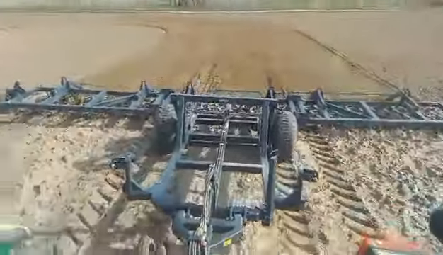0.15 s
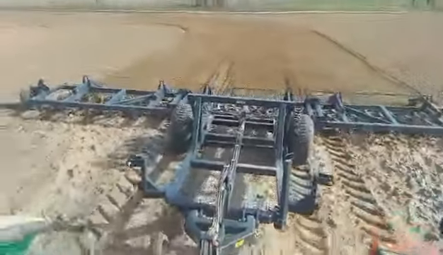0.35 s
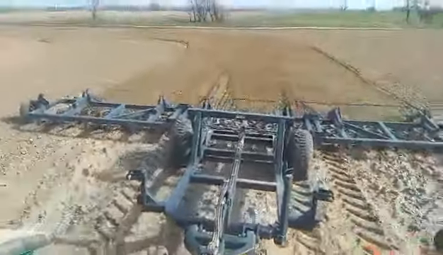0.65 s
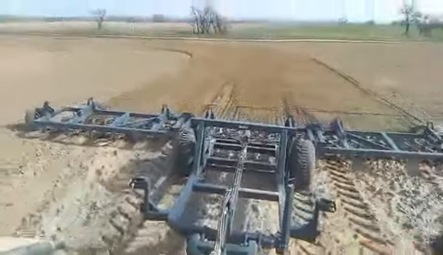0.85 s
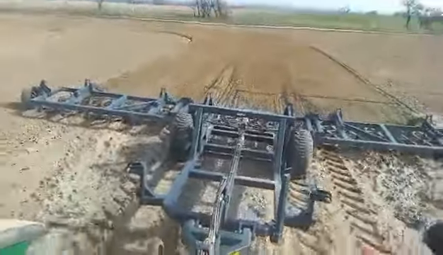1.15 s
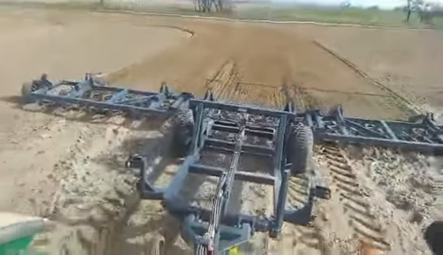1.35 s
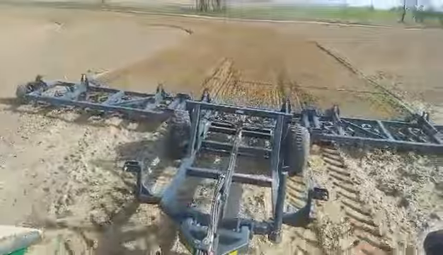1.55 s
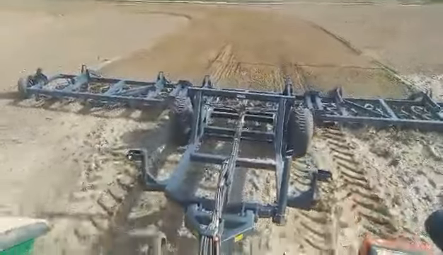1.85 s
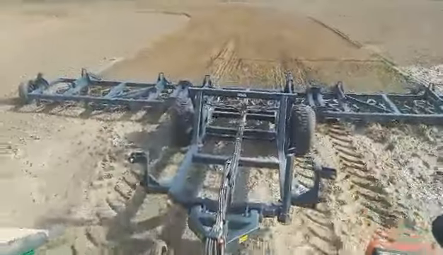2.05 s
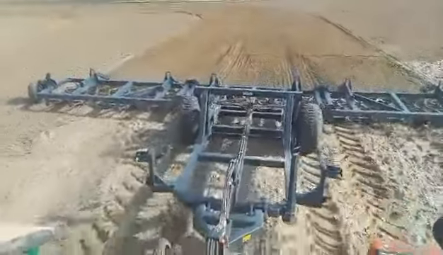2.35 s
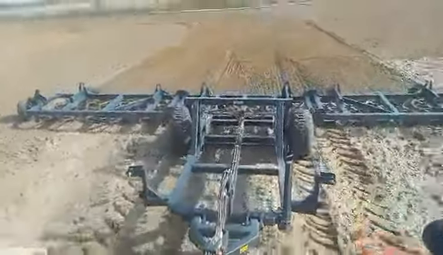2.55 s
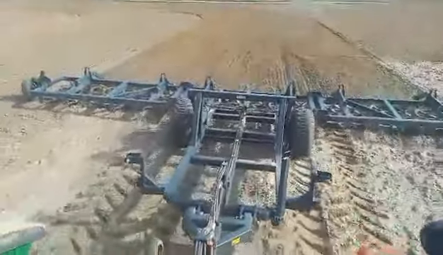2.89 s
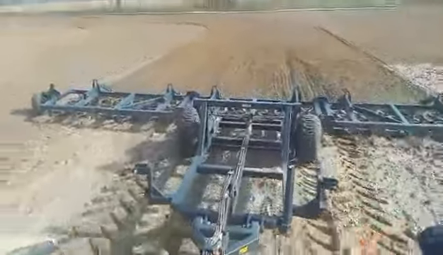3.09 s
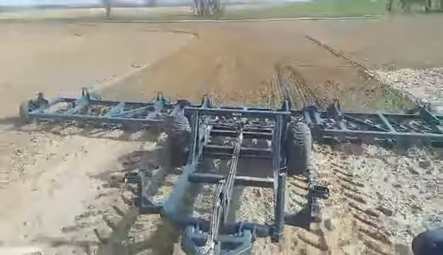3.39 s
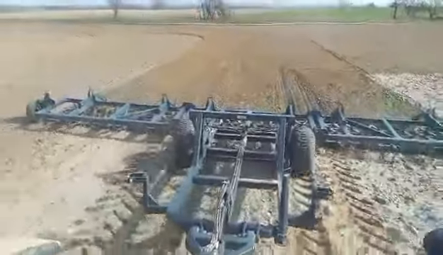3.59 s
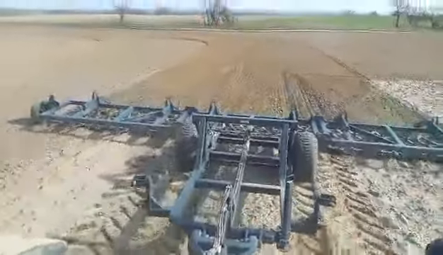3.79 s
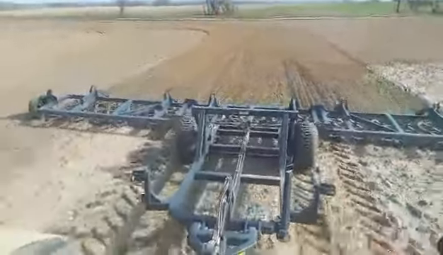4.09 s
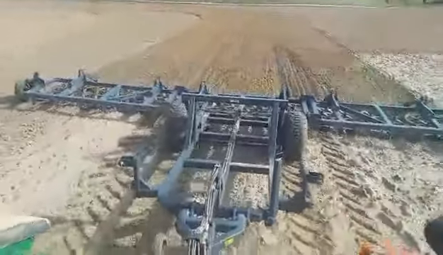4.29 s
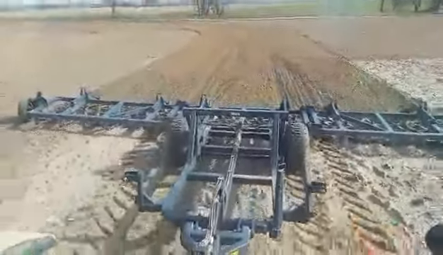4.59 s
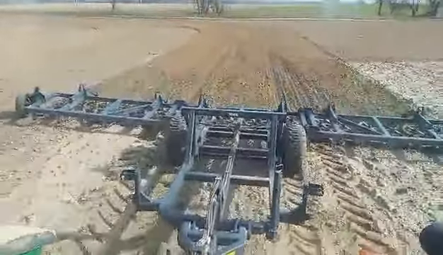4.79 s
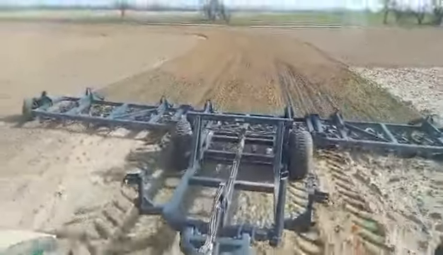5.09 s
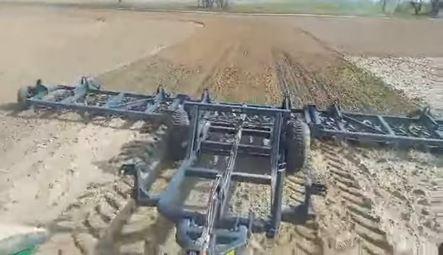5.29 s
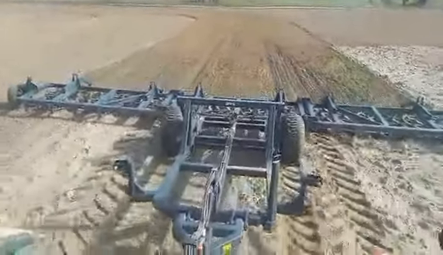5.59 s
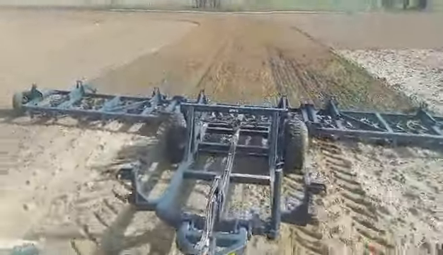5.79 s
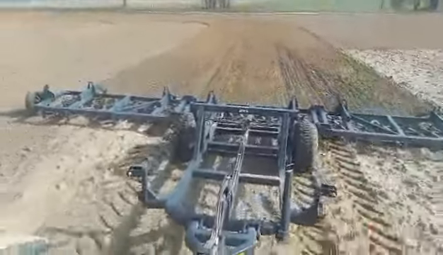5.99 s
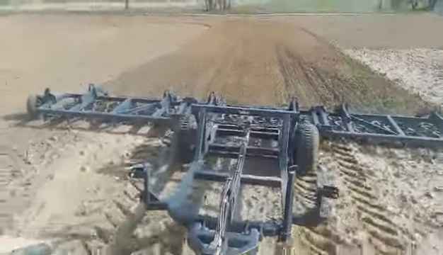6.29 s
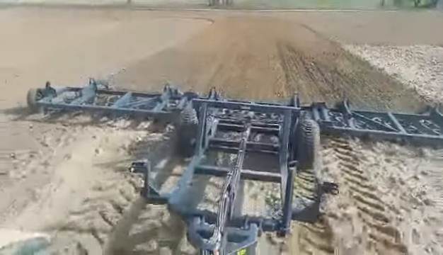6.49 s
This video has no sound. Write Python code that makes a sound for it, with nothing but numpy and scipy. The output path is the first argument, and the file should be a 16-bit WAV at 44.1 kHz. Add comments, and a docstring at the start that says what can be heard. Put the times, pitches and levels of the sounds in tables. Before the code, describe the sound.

Heavy diesel tractor pulling a steel harrow over dry ground, heard from the cab: surging low drone, rumble, crumbling soil, ticking fittings, hitch clanks.

```python
"""A six-cylinder tractor engine, built from tones at multiples of its cycle, is heard from inside the cab.
Its pitch sags and picks up and its main tone follows the load, while the running gear drones beside it.
Shaped noise makes the rolling rumble, soil roar, knock and hiss; random clicks make the crumbling soil.
Loose fittings tick and chatter, the harrow's links rattle and the hitch clanks over a bump: noise bursts
and dying tones. The turbocharger whistles faintly near the start."""
import sys
import numpy as np
from scipy import signal
from scipy.fft import rfft, irfft
from scipy.io import wavfile

SR = 44100
rng = np.random.default_rng(int(sys.argv[2]) if len(sys.argv) > 2 else 0)


def unload_audio(sound):
    """Save the sound as a 16-bit wav file, at the path given as the first command line argument."""
    columns = np.transpose(np.atleast_2d(sound))
    # keep every value between -1 and 1, then stretch to whole-number steps
    steps = np.round(np.clip(columns, -1, 1) * 32767)
    wavfile.write(sys.argv[1], SR, steps.astype(np.int16))


N = 293265
TIME = np.arange(N) / SR
FREQ = np.fft.rfftfreq(N, 1 / SR)
# How alike left and right are. Each row: frequency in Hz, likeness (1 the same, 0 unrelated, -1 opposite).
SIDE_LIKENESS = [(60, 1), (150, 0.96), (220, 0.84), (290, 0.6), (400, -0.27), (600, 1), (900, 0.16),
                 (1400, -0.19), (2400, 0.34), (4000, 0.066), (13000, -0.088)]


def amp(db):
    """Turns decibels into gain."""
    return 10 ** (np.asarray(db) / 20)


def unit(x):
    """Scales a sound to an rms (average strength) of 1."""
    return x / np.sqrt(np.mean(x ** 2) + 1e-20)


def read(points, hz):
    """Reads a table of values by frequency, on a logarithmic frequency axis."""
    f, value = np.transpose(points)
    return np.interp(np.log(hz + 1), np.log(f), value)


def curves(rows):
    """Draws each column of a time table as a line with a value at every sample."""
    s, *columns = np.transpose(rows)
    return [np.interp(TIME, s, c) for c in columns]


def add(mix, s, sound):
    """Mixes a stereo sound in at time s, cutting it off at the end of the mix."""
    part = mix[:, max(round(s * SR), 0):][:, :sound.shape[1]]
    part += sound[:, :part.shape[1]]


def drift(rate_hz):
    """Slow random wander of rms 1; a higher rate wanders faster."""
    t = np.linspace(0, N / SR, 4096)
    f = np.fft.rfftfreq(len(t), t[1])
    spectrum = rfft(rng.standard_normal(len(t))) * np.exp(-(f / rate_hz) ** 2)
    return np.interp(TIME, t, unit(irfft(spectrum)))


def colour(x, spectrum):
    """Filters a sound by a table of dB against frequency, then scales it to rms 1."""
    size = x.shape[-1]
    gain = amp(read(spectrum, np.fft.rfftfreq(size, 1 / SR)))
    return unit(irfft(rfft(x) * gain, size))


def noise(spectrum):
    """Stereo noise whose two sides are as alike at each frequency as the likeness table says."""
    mid, side = rfft(rng.standard_normal((2, N)))
    same = np.clip(read(SIDE_LIKENESS, FREQ), -1, 1)
    mid = mid * np.sqrt(1 + same)
    side = side * np.sqrt(1 - same)
    return colour(irfft(np.array([mid + side, mid - side]), N), spectrum)


def angle(hz):
    """Running phase of a tone in radians, from a random start."""
    return 2 * np.pi * (np.cumsum(hz) / SR + rng.random())


def swells(rows):
    """A bell-shaped swell of gain for each row: middle in seconds, level in dB, spread in seconds."""
    return sum(amp(db) * np.exp(-((TIME - s) / spread) ** 2 / 2) for s, db, spread in rows)


def peaks(hz, modes):
    """Gain in dB of a tone passing through resonances."""
    return sum(db / (1 + (2 * (hz - f) / width) ** 2) for f, width, db in modes)


def level_db(law, octaves, load_db):
    """A layer's level in dB rises with speed and with load, as far as its law says."""
    cruise_db, per_octave, per_load = law
    return cruise_db + per_octave * octaves + per_load * load_db


def cracks(per_s, spread_db):
    """Random clicks on each side, a few of them larger."""
    extra_db = spread_db * np.minimum(rng.exponential(1, (2, N)), 4)
    size = amp(extra_db) * rng.choice([-1, 1], (2, N))
    return size * (rng.random((2, N)) < per_s / SR)


def short_echoes(x, share=0.33, spread=.02, count=12):
    """Random short echoes within 0.02 s give the sound a fine, comb-like colour."""
    taps = np.zeros((2, int(spread * SR) + 2))
    for side in taps:
        delays = rng.integers(1, len(side), count)
        side[delays] = share * rng.choice([-1, 1], count) / np.sqrt(count)
    taps[:, 0] = 1  # the direct sound
    return unit(signal.oaconvolve(x, taps, axes=1)[:, :N])


def ring(modes, t, detune):
    """Dying tones of struck metal, slightly retuned for each call, with a random phase on each side."""
    out = 0
    for hz, db, t60 in modes:  # t60: seconds to fall by 60 dB
        tuned_hz = hz * (1 + detune * rng.standard_normal())
        turns = tuned_hz * t + rng.random((2, 1)) / 2
        out = out + amp(db - 60 * t / t60) * np.sin(2 * np.pi * turns)
    return out


def engine(firing_hz, load_db, firing_db=-20, uneven=0.11, uneven_hz=4, flutter=0.05, effort=1.0):
    """Six firings a cycle give the main tone; unequal cylinders add orders that sweep cab resonances."""
    # Strong engine orders. Each row: multiple of the four-stroke cycle, dB over the weak ones.
    strong_orders = [(4, 3), (9, 3.5), (12, 6), (13, 2.5), (15, 5.5), (18, 7.5), (21, 5.5), (27, 7),
                     (32, 5), (40, 6), (45, 8), (48, 9), (49, 4)]
    # Weak orders inside the cab, before its resonances. Each row: frequency in Hz, level in dB.
    weak_level = [(20, -76.5), (50, -38), (85, -37), (150, -32.5), (200, -47.5), (260, -48.5), (318, -61),
                  (350, -52), (390, -63.5), (560, -66.5), (800, -57)]
    # Cab resonances. Each row: frequency in Hz, width in Hz, boost in dB.
    cab_modes = [(114.8, 20, 9), (293.3, 28, 14), (337.8, 12, 7.5), (354, 2.7, 2.5), (529.7, 13, 11),
                 (552, 9.4, 11.5)]
    # Cab boom, order 10. Each row: time in seconds, level in dB.
    boom_level = [(0, -34), (.25, -15.5), (.5, -41.5), (1, -31), (1.35, -27), (1.7, -29), (2.3, -27),
                  (2.6, -49), (3, -31), (3.3, -16.5), (3.6, -27), (4, -20.5), (4.35, -22.5), (4.75, -18),
                  (5.15, -20), (5.5, -23), (6.1, -21), (6.65, -23)]
    # Exhaust hum, order 24. Each row: time in seconds, level in dB.
    hum_level = [(0, -35.5), (.8, -49), (1.1, -34.5), (1.5, -34.5), (1.8, -47), (2.3, -40.5), (2.6, -34),
                 (3.05, -38), (3.25, -53.5), (3.75, -48.5), (3.9, -37), (4.5, -29.5), (4.9, -47),
                 (5.1, -27.5), (5.35, -45), (5.62, -27), (5.85, -38), (6.05, -31.5), (6.27, -39.5),
                 (6.45, -31), (6.65, -41)]
    cycle = angle(firing_hz / 6)
    out = np.zeros((2, N))
    leading = {6: firing_db + load_db, 10: curves(boom_level)[0], 24: curves(hum_level)[0]}
    strong = {round(k): db for k, db in strong_orders}
    for order in range(2, 54):
        hz = firing_hz[::64] * order / 6  # every 64th sample is enough to read the levels
        phase = order * cycle + rng.uniform(0, 2 * np.pi)
        if order in leading:
            level = amp(leading[order]) * (1 + flutter * drift(10))
        else:
            order_db = read(weak_level, hz) + peaks(hz, cab_modes) + strong.get(order, 0)
            level = np.interp(TIME, TIME[::64], amp(order_db))
            level *= (firing_hz / firing_hz.mean()) ** effort
            level *= 1 + uneven * drift(uneven_hz)
            phase += uneven * drift(uneven_hz)
        # standing waves in the cab reach the two sides out of step
        apart = np.arccos(np.clip(read(SIDE_LIKENESS, hz.mean()), -1, 1)) / 2
        out += level * np.cos([phase + apart, phase - apart])
    return out


def running_gear(drone_hz, flutter=0.04):
    """A drone that follows ground speed, and a gear whine that swells as the tractor picks up."""
    # Each row: time in seconds, drone level in dB.
    drone_level = [(0, -16.5), (.15, -17), (.35, -21), (.8, -23), (1.1, -21), (1.45, -14), (1.65, -16),
                   (1.9, -24.5), (3.2, -23.5), (3.35, -18.5), (3.8, -21), (4.25, -19), (4.45, -22),
                   (4.9, -21), (5.3, -13.7), (5.55, -19.5), (5.85, -23.5), (6.1, -19), (6.65, -20.5)]
    # Each row: time in seconds, whine pitch in Hz, whine level in dB.
    whine_path = [(1.2, 380, -75), (1.63, 410, -46), (1.95, 425, -37.5), (2.22, 426, -36),
                  (2.35, 438, -39.5), (2.48, 450, -36.5), (2.62, 452, -78)]
    drone_gain = amp(curves(drone_level)[0]) * (1 + flutter * drift(6))
    whine_hz, whine_db = curves(whine_path)
    whine_gain = amp(whine_db) * (1 + flutter * drift(10))
    return drone_gain * np.cos(angle(drone_hz)) + whine_gain * np.cos(angle(whine_hz))


def rolling(rumble_db):
    """Rough ground shakes the cab, a bump thumps the chassis, and tyres and tines roar and moan in soil."""
    # Four noise colours. Each row: frequency in Hz, relative level in dB per Hz.
    rumble_colour = [(15, -34), (30, -28), (52, -16), (80, -4), (114, 0), (135, -7), (165, -6), (205, -12),
                     (280, -12.5), (320, -20), (355, -20.5), (480, -48.5), (900, -85)]
    roar_colour = [(150, -23), (300, -5), (400, -1), (480, -4.5), (555, -2), (630, -6), (710, -5.5),
                   (800, -10.5), (950, -10.5), (1300, -22.5), (2500, -47)]
    moan_colour = [(440, -39.5), (530, 11.5), (560, 13.5), (600, 2), (700, -37.5)]
    thump_colour = [(15, -20), (30, -6), (48, 15), (70, -5.5), (115, 18), (160, -0.5), (220, -30),
                    (500, -58)]
    # Tyres and tines in the soil, then the hollow moan. Each row: time in seconds, level in dB.
    roar_level = [(0, -42.5), (1.35, -40.5), (2.1, -40), (2.5, -36.5), (5.05, -41), (5.6, -39),
                  (6.65, -37.5)]
    moan_level = [(0, -58), (.7, -54.5), (1.4, -45), (2, -50), (3.3, -45.5), (3.8, -45.5), (4.4, -44.5),
                  (5.1, -42.5), (5.5, -47.5), (6.65, -62)]
    # A rough patch, then the thumps of a bump. Each row: middle in seconds, level in dB, spread in seconds.
    rough_patch = [(3.52, -34, 0.34)]
    bump_thumps = [(3.39, -17, 0.014), (3.568, -14, 0.029), (3.636, -18.5, 0.012)]
    rumble = (amp(rumble_db) + swells(rough_patch)) * noise(rumble_colour)
    roar = amp(curves(roar_level)[0] + 1.6 * drift(40)) * noise(roar_colour)
    moan = amp(curves(moan_level)[0]) * noise(moan_colour)
    thumps = swells(bump_thumps) * noise(thump_colour)
    return rumble + roar + moan + thumps


def clatter(firing_hz, clatter_db, depth=0.12, crank_depth=0.06, grain_db=1.4):
    """Combustion knock and grainy intake hiss pulse with each firing and each turn of the crank."""
    # Knock and hiss colours. Each row: frequency in Hz, relative level in dB per Hz.
    knock_colour = [(500, -26), (950, 4.5), (1400, 2.5), (1720, 0.5), (2100, -0.5), (2550, 2), (3100, -3.5),
                    (3800, -15.5), (5000, -24.5), (8000, -44)]
    hiss_colour = [(2000, -24.5), (3500, 6.5), (4700, 5), (5600, -1.5), (6700, -9), (7700, -21.5),
                   (8600, -23.5), (10500, -18.5), (13000, -9.5)]
    # Intake hiss. Each row: time in seconds, level in dB.
    hiss_level = [(0, -52.5), (.4, -56), (.7, -57.5), (1.05, -54), (1.4, -54), (1.6, -57), (1.93, -53.5),
                  (2.15, -56.5), (2.7, -52.5), (3.25, -57.5), (3.52, -54.5), (3.78, -54), (3.97, -56.5),
                  (4.5, -54), (4.9, -56.5), (5.2, -52.5), (5.82, -57.5), (6.65, -54)]
    crank = angle(firing_hz / 3)  # three firings a turn
    pulse = 1 + depth * np.cos(3 * crank) + crank_depth * np.cos(crank)
    knock = amp(clatter_db + 1.0 * drift(23)) * short_echoes(noise(knock_colour))
    hiss_db = curves(hiss_level)[0] + grain_db * drift(84)
    hiss = amp(hiss_db) * short_echoes(noise(hiss_colour))
    return pulse * (knock + hiss)


def soil(soil_db, per_s=550, spread_db=3):
    """Dry clods break into many tiny cracks; hard patches crunch."""
    # Crumbling soil. Each row: frequency in Hz, relative level in dB per Hz.
    crumb_colour = [(600, -28), (1500, 6), (2500, 5), (3300, -3), (4600, -11), (6000, -10.5), (9000, -40)]
    # Harder clods. Each row: middle in seconds, level in dB, spread in seconds.
    hard_clods = [(1.2, -53, 0.076), (1.48, -61.5, 0.031), (2.3, -62, 0.048), (2.72, -53.5, 0.036),
                  (3.44, -51.5, 0.14)]
    crumbs = short_echoes(colour(cracks(per_s, spread_db), crumb_colour))
    return (amp(soil_db) + swells(hard_clods)) * crumbs


def turbo(width_hz=350):
    """An airy whistle, a tone blurred by slow noise, that wavers in pitch and soon fades out."""
    # Each row: time in seconds, pitch in Hz, level in dB before the left-right balance.
    whistle_path = [(0, 12760, -74), (.3, 13000, -75), (.52, 12500, -68), (.8, 11800, -73),
                    (1.05, 12150, -67), (1.35, 12950, -58), (1.8, 13900, -86)]
    hz, whistle_db = curves(whistle_path)
    band = np.exp(-(FREQ / width_hz) ** 2)
    air = unit(irfft(rfft(rng.standard_normal((2, N))) * band, N))
    balance = amp([[-4], [3]])  # dB, left and right
    return amp(whistle_db) * air * np.cos(angle(hz)) * balance


def panel(grain_db=3, per_s=2500, spread_db=2):
    """A loose panel chatters by itself in short swells of tiny taps."""
    # Each row: middle in seconds, level in dB, spread in seconds.
    chatter_swells = [(.155, -50.5, 0.014), (.573, -45.5, 0.011), (1.11, -57, .012), (1.33, -54, 0.018),
                      (2.28, -61, .012), (2.43, -43, 0.0072), (2.555, -45, 0.013), (2.675, -50, .016),
                      (2.84, -51, 0.028), (3.12, -49.5, 0.027), (4.297, -44, 0.012), (4.56, -50, .025),
                      (4.772, -47, 0.01), (5.04, -47, 0.035), (5.26, -50, 0.023), (5.685, -46, 0.021),
                      (5.95, -48.5, 0.052), (6.17, -47.5, .015), (6.25, -45, 0.03), (6.44, -48, .013),
                      (6.56, -47, 0.043)]
    # Each row: frequency in Hz, relative level in dB.
    chatter_colour = [(900, -9.5), (2400, 7.5), (3500, 8), (5000, 4.5), (6500, -2), (7800, -10.5),
                      (9000, -17), (11000, -7.5), (13000, -12.5)]
    taps = colour(cracks(per_s, spread_db), chatter_colour)
    return swells(chatter_swells) * amp(grain_db * drift(140)) * taps


def grit(ring_hz=2000, decay=0.00063, right_db=-20):
    """A grain of grit snaps beside the left microphone: a tone that dies within a few milliseconds."""
    # Each row: start in seconds, left level in dB.
    grit_snaps = [(0.5783, -19)]
    out = np.zeros((2, N))
    t = np.arange(256) / SR
    snap = np.exp(-t / decay) * np.cos(2 * np.pi * ring_hz * t - np.pi / 4)
    for s, db in grit_snaps:
        add(out, s, amp([[db], [db + right_db]]) * snap)
    return out


def singing(waver=.006):
    """A shaken panel swells on a slightly unsteady note and dies away."""
    # Each row: middle in seconds, pitch in Hz, level in dB, spread in seconds.
    panel_notes = [(2.1, 346, -38, 0.09), (2.45, 667, -45, 0.091), (2.46, 920, -47.5, 0.062),
                   (2.76, 709, -38.5, 0.029), (3.246, 339.7, -34.5, 0.15), (3.733, 895, -45, 0.027)]
    out = 0
    for s, hz, db, spread in panel_notes:
        wavering_hz = hz * (1 + waver * drift(23))
        out = out + swells([(s, db, spread)]) * np.cos(angle(wavering_hz))
    return out


def harrow(per_s=80, spread_db=2, detune=.07, rise=.0002, count=7):
    """Steel links of slightly different sizes strike one another in dense bursts."""
    # Loose links rattling together. Each row: middle in seconds, level in dB, spread in seconds.
    rattle_swells = [(2.43, -42.5, .011), (3.625, -41.5, .05), (4.832, -46.5, .01), (5.003, -45, .012),
                     (5.92, -44.5, .018), (6.255, -42.5, .028)]
    # Tones of a link. Each row: frequency in Hz, level in dB, time to fall 60 dB in seconds.
    link_modes = [(1150, -6, .015), (1750, -1, .025), (2150, 0, .02), (2650, -3, .015), (3800, -10, .012),
                  (4900, -9, .015), (6000, -14, .012)]
    t = np.arange(1024) / SR
    links = 0
    for _ in range(count):
        strikes = cracks(per_s, spread_db)
        link = (1 - np.exp(-t / rise)) * ring(link_modes, t, detune)
        links = links + signal.oaconvolve(strikes, link, axes=1)[:, :N]
    return swells(rattle_swells) * unit(links)


def tick(db, top_db, t60=0.025, rise=0.00015, snap_db=4, snap_t60=0.0089,
         cab_db=-22, cab_t60=0.18, ring_db=1, detune=.02):
    """A snap, a short dry burst and a thin ring, followed by the cab's brief echo."""
    # Colour of the burst. Each row: frequency in Hz, relative level in dB.
    tick_colour = [(800, -14), (2200, 10), (3200, 7), (4400, 3.5), (5700, 4), (6800, -5.5), (7700, -9.5),
                   (9000, -7), (10500, -5.5), (12600, -2), (14000, 1.5)]
    # Tones of the fitting. Each row: frequency in Hz, level in dB, time to fall 60 dB in seconds.
    fitting_modes = [(4360, -11.5, 0.071), (5770, -13, 0.026), (7860, -20.5, 0.032), (10320, -20, 0.053),
                     (11800, -19, 0.055)]
    t = np.arange(4096) / SR
    snap = amp(snap_db - 60 * t / snap_t60)
    echo = amp(cab_db - 60 * t / cab_t60)
    decay = snap + amp(-60 * t / t60) + echo
    # the extra treble comes in gradually from 6 to 10 kHz
    tone = [(hz, level + top_db * np.clip((hz - 6000) / 4000, 0, 1)) for hz, level in tick_colour]
    burst = decay * colour(rng.standard_normal((2, len(t))), tone)
    thin_ring = amp(ring_db) * ring(fitting_modes, t, detune)
    return amp(db) * (1 - np.exp(-t / rise)) * (burst + thin_ring)


def fittings():
    """A loose fitting ticks in short runs, each tick a small knock with its own brightness."""
    # Each row: start in seconds, level in dB, extra top treble in dB.
    tick_times = [(2.824, -49, -5), (3.1222, -35.5, -1), (3.1546, -37, 3), (3.194, -35.5, 3),
                  (3.8379, -40, -2), (3.885, -48.5, 1), (4.11, -37.5, 5), (4.1135, -42, 0),
                  (4.1364, -39, 1), (4.1649, -39, 4), (4.171, -43, -1), (4.2083, -42, 0), (4.213, -44, -4),
                  (4.2851, -49, -3), (4.604, -43, -8), (4.629, -40.5, -13), (4.6678, -42.5, -7),
                  (4.759, -45, -11), (5.063, -44, -9), (5.0862, -38.5, -8), (5.1203, -38, -0.5),
                  (5.3242, -43.5, -19), (5.5232, -38, -6), (5.5307, -39.5, -9), (5.589, -39, -7),
                  (5.955, -45, -4), (5.9818, -41, -8), (6.0077, -38.5, -6), (6.0545, -38.5, -4),
                  (6.1742, -44, 2), (6.1948, -47, -1), (6.4276, -46, -4), (6.455, -40, -10),
                  (6.4878, -39, -11), (6.5465, -37.5, -11)]
    out = np.zeros((2, N))
    for s, db, top_db in tick_times:
        add(out, s, tick(db, top_db))
    return out


def hitch(t60=0.05, jangle_t60=.09, detune=0.015):
    """The drawbar knocks against its pin: a dull crack, a bright jangle and a short ring of steel."""
    # Each row: start in seconds, crack level in dB, ring against crack in dB, jangle level in dB,
    # rise time in seconds.
    clank_times = [(3.0845, -28.5, -15, -52, .0015), (3.586, -37, -16, -46, .0015),
                   (3.5988, -27.5, -6, -43, .0017), (3.6295, -36, -14, -39, .0008),
                   (3.6375, -27, -7, -46, .0017), (3.6685, -26.5, -14, -37, .0017),
                   (3.835, -25.5, -9, -41.5, .0004), (3.853, -42, 4, -62, .001),
                   (4.432, -32, -16, -52, .0015), (4.8156, -28.5, -18, -54, .001),
                   (4.9877, -28, -16, -48, .0016), (5.908, -29.5, -14, -54, .002),
                   (6.3705, -31.5, -14, -60, .001)]
    # Crack and jangle colours. Each row: frequency in Hz, relative level in dB per Hz.
    crack_colour = [(400, -17), (900, 9.5), (1350, 4.5), (1750, 7), (2150, 9), (2600, 1.5), (3100, -1),
                    (4800, -10), (7500, -27), (13000, -26)]
    jangle_colour = [(900, -10), (2400, 0), (3500, 4), (5100, 12), (6500, -2), (7800, -8), (8700, -20),
                     (11000, -19), (13000, -25)]
    # Tones of the hitch. Each row: frequency in Hz, level in dB, time to fall 60 dB in seconds.
    hitch_modes = [(900, -12, .06), (1660, -7, .045), (1765, 0, .095), (1860, -5, .06), (2120, -1, .035),
                   (2600, -9, .04), (4930, -12, .04), (7550, -24, .04)]
    out = np.zeros((2, N))
    t = np.arange(8192) / SR
    for s, db, ring_db, jangle_db, rise in clank_times:
        crack = colour(rng.standard_normal((2, len(t))), crack_colour) * amp(db - 60 * t / t60)
        jangle = colour(rng.standard_normal((2, len(t))), jangle_colour)
        jangle *= amp(jangle_db - 60 * t / jangle_t60)
        steel = amp(db + ring_db) * ring(hitch_modes, t, detune)
        add(out, s, (1 - np.exp(-t / rise)) * (crack + jangle + steel))
    return out


def scene():
    """Adds up all that is heard in the cab; engine speed, ground speed and load steer the main layers."""
    # Each row: time in seconds, firing rate in Hz, pitch of the running gear's drone in Hz.
    speed_path = [(0, 68.6, 154.5), (.36, 68, 146), (.68, 61.7, 130), (.88, 60.9, 130), (1.3, 69.7, 149),
                  (1.66, 77.1, 164.8), (1.97, 78.7, 177), (2.18, 79.7, 178), (2.5, 83.2, 186.5),
                  (3.07, 85.1, 188), (3.33, 76.4, 164), (3.68, 72.5, 153.5), (4.15, 73.4, 151),
                  (4.68, 69.3, 143.3), (5, 72, 150.5), (5.52, 74.9, 169.5), (5.82, 74.3, 171.5),
                  (6.1, 73.8, 165.5), (6.3, 73.8, 169), (6.65, 74.1, 167.5)]
    # How hard the engine pulls. Each row: time in seconds, load in dB.
    load_path = [(0, 1.5), (.15, 1.5), (.3, -5), (.55, -11), (.8, -4), (1, 5), (1.45, 4.5), (1.72, -2.5),
                 (2.15, -1), (2.35, 3), (2.7, 5), (3.13, 4), (3.42, -5), (3.8, -1), (4.1, -4), (4.55, -5.5),
                 (5.02, 4), (5.25, 3.5), (5.55, -1.3), (6.65, 1)]
    # Three level laws. Each holds: dB when cruising, dB per octave of speed, dB per dB of load.
    rumble_law = (-28.2, 16, 0)
    clatter_law = (-46.5, 10, 0.13)
    soil_law = (-53.5, 4.9, .2)
    cruise_firing_hz, cruise_drone_hz = 73, 157
    firing_hz, drone_hz = curves(speed_path)
    load_db, = curves(load_path)
    revs = np.log2(firing_hz / cruise_firing_hz)  # octaves above cruising
    pace = np.log2(drone_hz / cruise_drone_hz)
    machine = engine(firing_hz, load_db) + running_gear(drone_hz)
    ground = rolling(level_db(rumble_law, pace, load_db))
    knock = clatter(firing_hz, level_db(clatter_law, revs, load_db))
    crumbling = soil(level_db(soil_law, pace, load_db))
    rattles = panel() + grit() + singing() + harrow() + fittings() + hitch()
    return machine + ground + knock + crumbling + turbo() + rattles


def record(dry):
    """Tilts the balance between left and right by frequency, then removes the highest treble."""
    # Left-right balance. Each row: frequency in Hz, left minus right in dB.
    side_balance = [(30, 1), (200, -1.5), (700, 0), (1150, -2.5), (1600, 0), (3000, 0), (4300, -2.5),
                    (5800, -5), (6500, -4), (7400, 16.5), (8600, 7), (12500, 9)]
    edge_hz = 13150
    lean_db = read(side_balance, FREQ) / 2
    faded = dry * signal.windows.tukey(N, .002)  # very short fades at both ends
    heard = irfft(rfft(faded) * amp([lean_db, -lean_db]), N)
    low_pass = signal.firwin(401, edge_hz, window=("kaiser", 9), fs=SR)
    return signal.oaconvolve(heard, low_pass[None], "same", axes=1)


dry = scene()
out = record(dry)
unload_audio(out)
```